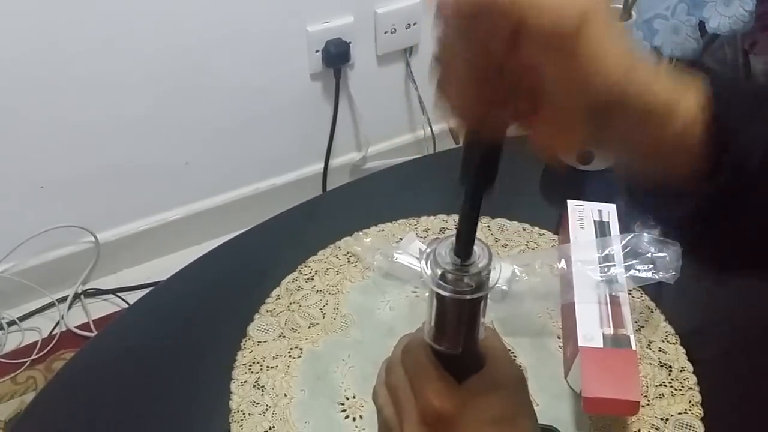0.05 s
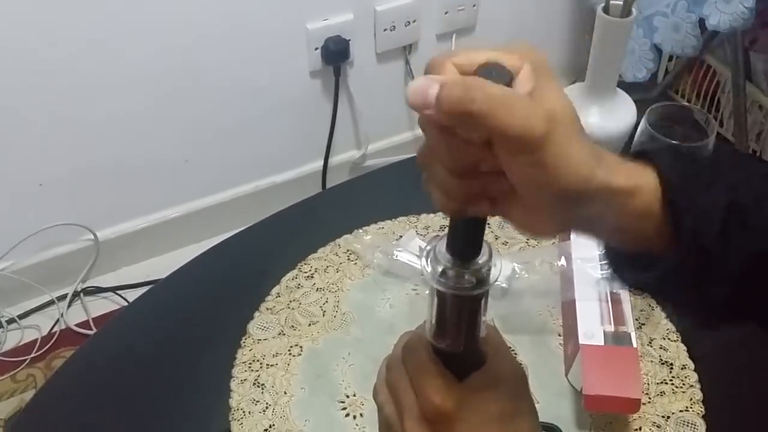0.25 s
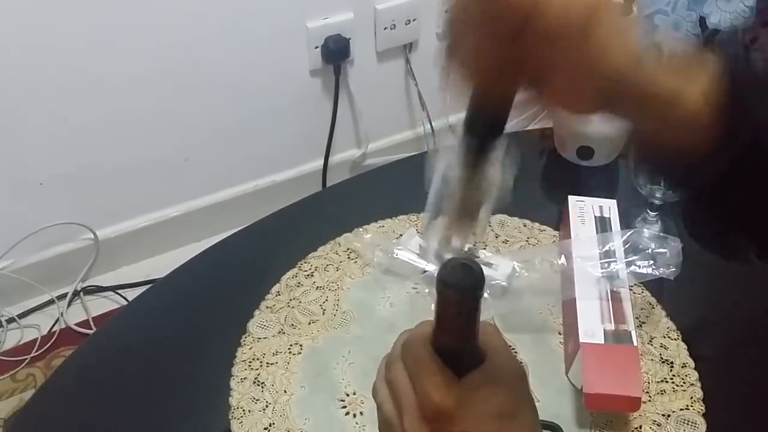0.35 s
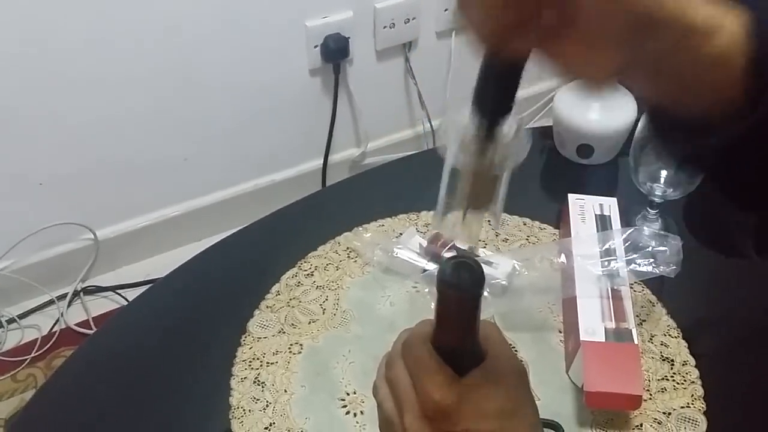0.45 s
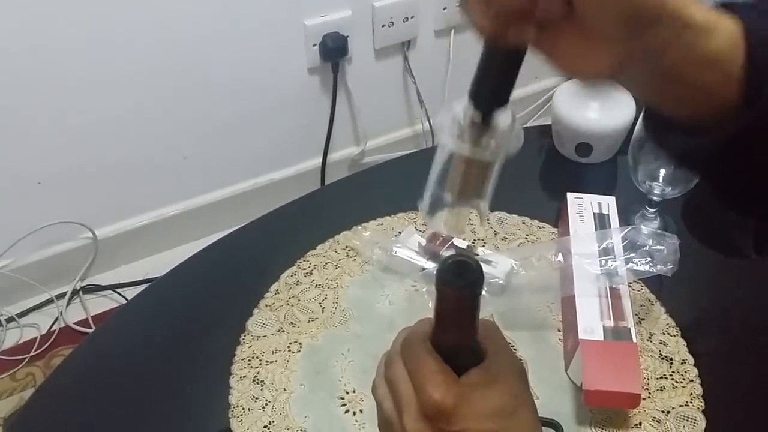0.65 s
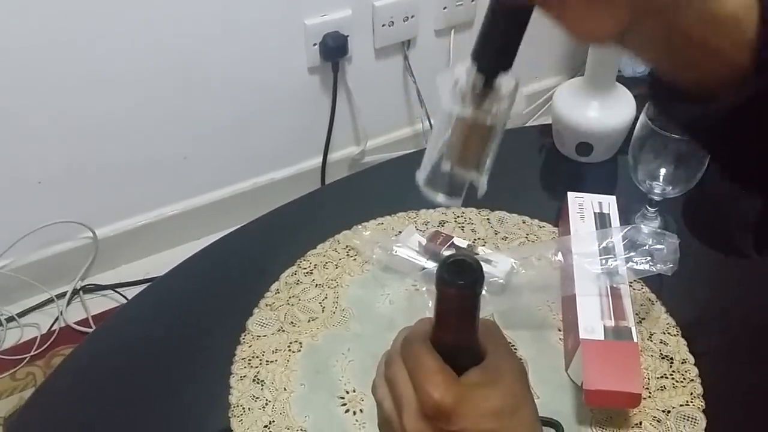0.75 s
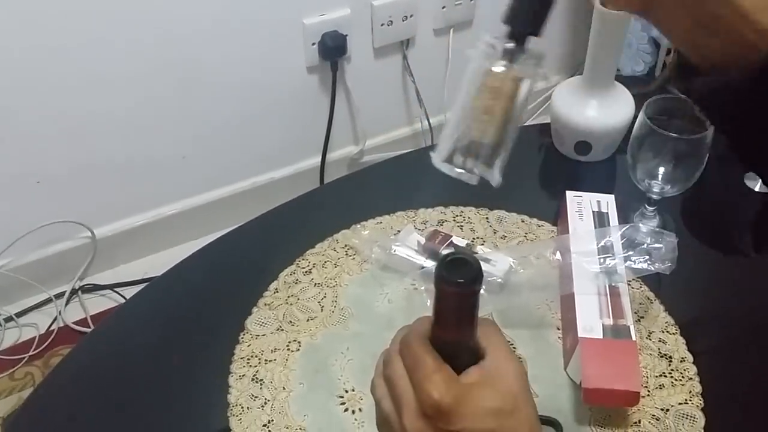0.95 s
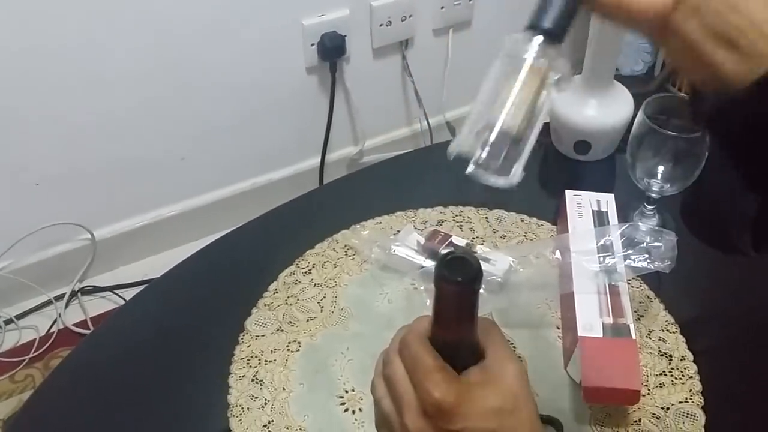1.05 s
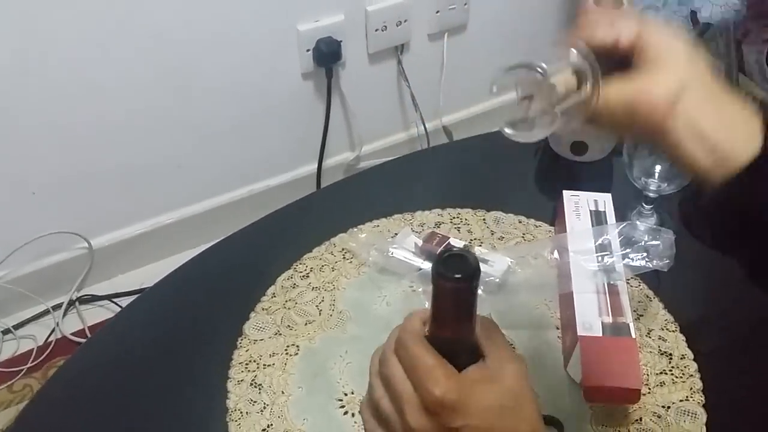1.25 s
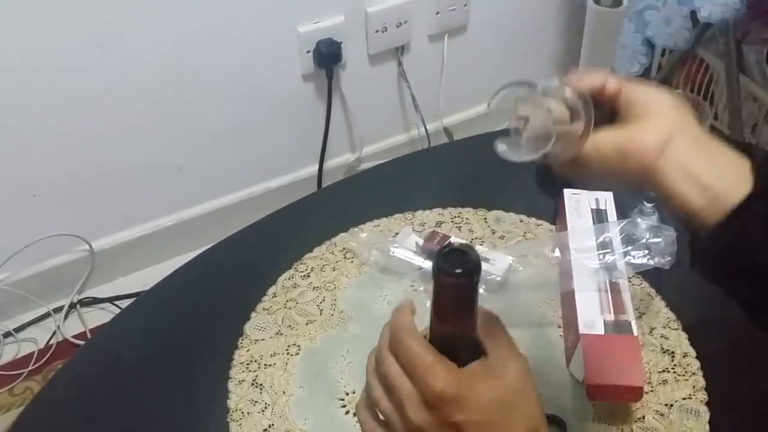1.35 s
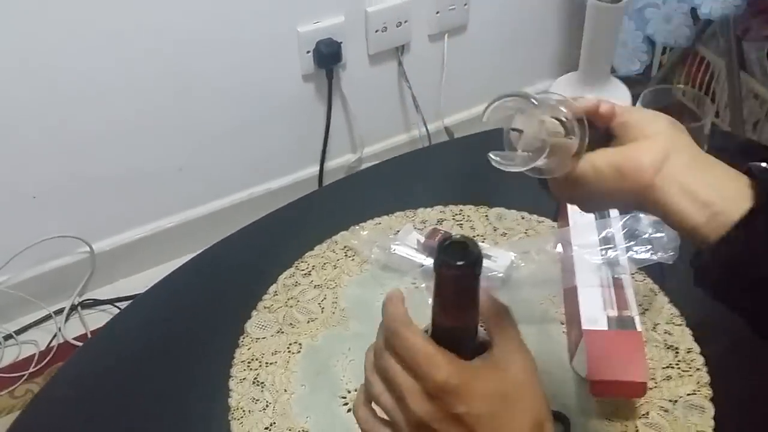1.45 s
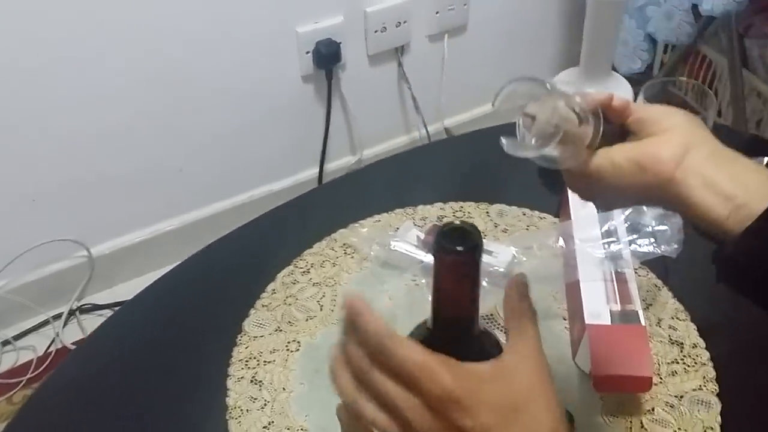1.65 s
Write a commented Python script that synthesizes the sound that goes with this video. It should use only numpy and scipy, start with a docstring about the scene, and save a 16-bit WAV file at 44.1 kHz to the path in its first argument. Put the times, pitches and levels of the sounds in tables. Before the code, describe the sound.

A cork pops from a wine bottle, close by in a small room. First an air-pump opener's plunger slides with a soft hiss, ticks and tiny squeaks, knocking on its stop at 0.2 seconds. At 0.3 the loud, hollow pop comes, the cork instantly slapping into the plastic tube, with brief reverberation. Two very faint taps follow near 0.55 and 0.7, then only faint electrical hum and hiss until 1.7.

```python
"""A cork pops from a wine bottle, pushed out by an air-pump opener on a table in a small room.
First the plunger slides down with a friction hiss, ticks and squeaks, and knocks on its stop.
The cork cracks free, and the escaping air rings the bottle neck and the low modes of bottle, tube and room.
The cork slaps into the opener's tube, the room reverberates briefly, and two faint taps follow.
Mains hum and faint hiss lie underneath."""
import sys
import numpy as np
from scipy import signal
from scipy.fft import rfft, irfft
from scipy.io import wavfile
from scipy.ndimage import uniform_filter1d

SR = 44100
rng = np.random.default_rng(int(sys.argv[2]) if len(sys.argv) > 2 else 0)


def to_wav(s):
    """Save 16-bit WAV."""
    ch = np.atleast_2d(s).T  # columns
    pcm = np.round(np.clip(ch, -1, 1) * 32767)  # PCM
    wavfile.write(sys.argv[1], SR, pcm.astype(np.int16))


N = 74970

# likeness of left and right noise: frequency_hz, correlation
COHERENCE = [(100, 0.87), (300, 0.82), (600, 1), (1100, .35), (2200, 0.045), (15000, 0.061)]
# partials of the mains hum: pitch_hz, level_db
HUM_PARTIALS = [(100, -70), (199.5, -62.5), (247.5, -72.5), (300, -83)]
# envelopes of hum, background hiss and plunger friction: time_s, gain_db
HUM_ENVELOPE = [(0, 8), (.15, 8.5), (.5, 0), (.65, -1.5), (.95, -2), (1.15, 1), (1.35, 6), (1.43, 0.5),
                (1.7, 1)]
HISS_ENVELOPE = [(0, -55), (.55, -65), (.9, -66.5), (1.1, -63.5), (1.35, -60), (1.5, -61.5), (1.7, -61)]
FRICTION_ENVELOPE = [(0, -71), (.035, -60), (.09, -57.5), (.135, -59.5), (.165, -51.5), (.185, -56),
                     (.26, -56.5), (.285, -51.5), (.31, -54), (.34, -75)]
# catches of the sliding plunger: start_s, level_db, pitch_hz
TICKS = [(0.0284, -43.5, 3000), (.0348, -49, 2860), (0.0494, -49.5, 2660), (0.0593, -47, 2640),
         (0.0936, -36.5, 2400), (0.309, -45.5, 2356)]
# squeaks of the seal: centre_s, width_s, pitch_hz, level_db
SQUEAKS = [(0.098, .012, 760, -59.5), (.168, .004, 5300, -54), (.25, 0.0042, 770, -37),
           (0.282, 0.0047, 765, -38.5)]
# taps as the opener is lifted away: start_s, level_db
TAPS = [(0.545, -59.5), (0.691, -60)]
# normal modes: pitch_hz, level_db, t60_s, rise_s
KNOCK_MODES = [(75.23, -36, .12, 0.0048), (234, -25, .09, 0.0025), (339.7, -11.5, .14, .032),
               (450, -30, 0.12, 0.0014), (752.5, -30.5, .17, 0.0024), (905, -30, .14, .002),
               (936, -39.5, 0.14, .002), (2820, -19.5, 0.017, 0.0001), (4920, -21.5, 0.0062, 0.00013),
               (3062, -42.5, .15, .001), (5010, -43, .2, .001)]  # pump and bottle
POP_MODES = [(168, -23.5, 0.13, 0.0034), (228.1, -19.5, 0.16, 0.002), (255.6, -17.5, 0.17, .002),
             (340.9, -26, .24, 0.0033), (428, -20, .19, 0.0024), (519.5, -25, .16, .003),
             (603.3, -15.5, .16, 0.0046), (628.3, -16.5, .17, 0.0084), (681, -21.5, 0.15, .005),
             (727, -22, .2, .005), (820, -19, 0.2, .004), (902.8, -21.5, .18, 0.0058),
             (968.4, -23, .22, .008), (997, -21.5, 0.32, .008), (1040, -19.5, 0.27, .01),
             (1145, -27.5, .18, .003), (1317, -31.5, 0.25, 0.0017), (1541, -36, .2, 0.0026)]  # bottle, tube and room
TUBE_MODES = [(3330, -26, .05, .001), (5010, -24.5, 0.061, 0.00087)]  # the opener's plastic tube
# noise spectra: frequency_hz, gain_db
HISS_SPECTRUM = [(25, 0), (60, -1.5), (100, 2.5), (170, 5.5), (300, -0.5), (500, -2), (800, -5),
                 (1600, -10), (3800, -19.5), (5200, -15), (6700, -6), (7500, -11.5), (8500, -22),
                 (14500, -23)]  # background hiss
FRICTION_SPECTRUM = [(200, -4.5), (340, 6), (480, -5), (770, 2), (1300, -5.5), (2900, -1), (4000, -3),
                     (5200, 0.5), (7200, -4.5), (9000, -10), (15000, -21)]  # rod on barrel
CLICK_SPECTRUM = [(500, -13.5), (1200, -8.5), (1900, 2), (2800, 2), (3900, -8.5), (5000, -1.5),
                  (7000, -2.5), (9000, -16.5), (11000, -29.5), (15000, -32.5)]  # plastic on plastic
KNOCK_ROOM_SPECTRUM = [(50, -14), (200, 2.5), (500, -6), (900, 1), (1300, -7.5), (2000, -11), (3000, -11.5),
                       (4000, -23), (5500, -18), (7200, -16), (9500, -23), (11000, -29), (15000, -35)]  # reverberation of the knock
BOOM_SPECTRUM = [(30, -31), (70, -17), (115, -18.5), (170, -6.5), (450, -3.5), (700, -1.5), (1080, 1.5),
                 (1300, -14.5), (1550, -23.5), (3000, -52.5)]  # low reverberation of the pop
TAIL_SPECTRUM = [(700, -14), (1400, 0), (2600, 1), (3800, -4), (5000, -0.5), (5700, -6), (6600, 4.5),
                 (8000, -4.5), (10000, -5), (14000, -11), (16000, -15)]  # bright reverberation of the pop
CRACK_SPECTRUM = [(800, -6), (1800, 1), (2700, 0), (3900, -5), (5200, -5), (6500, 9), (7800, -5.5),
                  (9200, 4), (11000, -10.5), (15000, -8.5)]  # cork leaving the neck
SLAP_SPECTRUM = [(800, -11.5), (1800, -3), (3100, 3), (4000, -6.5), (5000, -3), (7000, 1.5), (9000, -2.5),
                 (11000, -1), (14000, -6)]  # cork on tube
TAP_SPECTRUM = [(200, 1), (700, 5), (2000, 0), (3500, -18), (8000, -27)]  # handling

KNOCK_S, POP_S, CRACK_S, CATCH_S = .1978, .3164, .3171, .3372
PUMP_PAN_DB, POP_PAN_DB = 6.5, -1.45


def undb(db):
    """Amplitude ratio of a level in decibels."""
    return 10 ** (np.asarray(db) / 20)


def since(start):
    """Seconds elapsed since start, zero before it."""
    return np.maximum(np.arange(N) / SR - start, 0)


def envelope(points):
    """Gain over time, linear in decibels between (time_s, gain_db) points."""
    return undb(np.interp(since(0), *np.array(points).T))


def fade(t, t60, rise, hold=0):
    """Exponential build-up and damping: after the hold, 60 dB of decay every t60 seconds."""
    return (1 - np.exp(-t / rise)) * undb(-60 * np.maximum(t - hold, 0) / t60)


def pulse(t, centre, width):
    """Gaussian pulse whose width is its standard deviation."""
    return np.exp(-((t - centre) / width) ** 2 / 2)


def pan(db):
    """Stereo gains for a level difference, left over right."""
    gains = undb(np.array([[db], [-db]]) / 2)
    return gains / gains.mean()


def noise(spectrum):
    """Partially coherent stereo noise, alike in the bass and unrelated in the treble; mid rms is 1."""
    log_hz = np.log(np.maximum(np.fft.rfftfreq(N, 1 / SR), 1))
    along = lambda points: np.interp(log_hz, np.log(np.array(points)[:, 0]), np.array(points)[:, 1])
    correlation = along(COHERENCE)
    mid, side = rfft(rng.standard_normal((2, N))) * undb(along(spectrum))
    side = side * np.sqrt((1 - correlation) / (1 + correlation))
    return irfft(np.array([mid + side, mid - side]), N) / irfft(mid, N).std()


def ring(t, hz, db, t60, rise):
    """Damped oscillation of one normal mode."""
    return undb(db) * fade(t, t60, rise) * np.sin(2 * np.pi * hz * t)


def room_tone():
    """Slow random amplitude modulation makes each partial of the mains hum waver over faint hiss."""
    t, hum = since(0), 0
    for hz, db in HUM_PARTIALS:
        waver_db = 2 * np.interp(t, np.linspace(0, t[-1], 40), rng.standard_normal(40))
        hum += undb(db + waver_db) * np.sqrt(2) * np.sin(2 * np.pi * (hz * t + rng.random()))
    return hum * envelope(HUM_ENVELOPE) + noise(HISS_SPECTRUM) * envelope(HISS_ENVELOPE)


def plunger():
    """Sliding friction of rod on barrel makes noise; each catch excites a damped plastic tick."""
    out = noise(FRICTION_SPECTRUM) * envelope(FRICTION_ENVELOPE) * pan(PUMP_PAN_DB)
    click_noise, room_noise = noise(CLICK_SPECTRUM), noise(CLICK_SPECTRUM)
    t60 = .016
    for start, db, hz in TICKS:
        t = since(start)
        tone = ring(t, hz, db, t60, rise=.00016) + ring(t, 2 * hz, db - 2.5, t60, rise=.000204)
        click = click_noise * undb(db - 6) * fade(t, t60, rise=.0001)
        room = room_noise * undb(db - 16.5) * fade(t, t60=.1125, rise=.004)
        out += (tone + click) * pan(PUMP_PAN_DB) + room
    return out


def seal_squeaks():
    """Stick-slip oscillation of the seal gives brief tones of unsteady pitch."""
    jitter, out = .019, 0
    for centre, width, hz, db in SQUEAKS:
        wobble = uniform_filter1d(rng.standard_normal(N), size=100)
        phase = 2 * np.pi * np.cumsum(hz * (1 + jitter * wobble / wobble.std())) / SR
        out += undb(db) * pulse(since(0), centre, width) * np.sin(phase)
    return out


def plunger_knock():
    """Impact on the stop makes a click and excites the modes of pump and bottle; the room reverberates."""
    t = since(KNOCK_S)
    # lower modes lie nearer the centre
    body = sum(ring(t, hz, *rest) * pan(PUMP_PAN_DB * min(hz / 3000, 1)) for hz, *rest in KNOCK_MODES)
    click = noise(CLICK_SPECTRUM) * undb(-20) * fade(t, t60=.0098, rise=.0001) * pan(PUMP_PAN_DB)
    room = noise(KNOCK_ROOM_SPECTRUM) * undb(-29.5) * fade(t, t60=.27, rise=.0025)
    return body + click + room


def neck_resonance(t):
    """The air in the neck oscillates, its resonant frequency rising as the cork clears the mouth."""
    start_hz, open_hz, clear_s = 498, 1079, .0024
    opening = (1 + np.tanh((t - clear_s) / .00036)) / 2
    hz = start_hz + (open_hz - start_hz) * opening
    phase = 2 * np.pi * np.cumsum(hz * (t > 0)) / SR
    puff = undb(-3) * pulse(t, centre=.002, width=.0011)
    note = undb(-8) * fade(t, t60=.13, rise=.006)
    room = undb(-27) * fade(t, t60=.17, rise=.03)
    return (puff + note + room) * np.sin(phase)


def low_resonances():
    """Free vibration of bottle, tube and room; a time difference sets the modes on alternate sides."""
    lag_s = np.array([[.00025], [-.00025]]) / 2
    return sum(ring(since(POP_S + (-1) ** k * lag_s), *mode) for k, mode in enumerate(POP_MODES))


def cork_pop():
    """Pressure release excites the neck and the low modes; the small mouth radiates bass poorly."""
    right_lag_s = .00014
    neck = np.array([neck_resonance(since(POP_S + lag)) for lag in (0, right_lag_s)])
    radiation = signal.butter(2, 135.1, "high", fs=SR, output="sos")
    return signal.sosfilt(radiation, neck + low_resonances()) * pan(POP_PAN_DB)


def pop_reverberation():
    """Reverberation of the small room decays exponentially, as a low boom and a bright tail."""
    t = since(POP_S)
    boom = noise(BOOM_SPECTRUM) * undb(-17.5) * fade(t, t60=.28, rise=.017)
    tail = noise(TAIL_SPECTRUM) * undb(-29.5) * fade(t, t60=.225, rise=.005, hold=.027)
    return boom * pan(POP_PAN_DB) + tail * pan(db=2)


def cork_crack():
    """The cork's last slip and sudden release make a short, hence broadband, transient."""
    slip = undb(-22) * pulse(since(0), CRACK_S, width=.00036)
    release = undb(-8) * fade(since(CRACK_S), t60=.008, rise=.0001)
    return noise(CRACK_SPECTRUM) * (slip + release) * pan(db=9)


def cork_catch():
    """Impact of the flying cork makes a slap and excites the modes of the plastic tube."""
    t = since(CATCH_S)
    slap = noise(SLAP_SPECTRUM) * undb(-11) * fade(t, t60=.018, rise=.0026)
    ping = sum(ring(t, *mode) for mode in TUBE_MODES)
    return (slap + ping) * pan(db=7)


def handling_taps():
    """Light impacts, as the opener is lifted away, give quickly damped bursts of noise."""
    bursts = sum(undb(db) * fade(since(start), t60=.048, rise=.001) for start, db in TAPS)
    return noise(TAP_SPECTRUM) * bursts


def scene():
    """Superposition of room tone, pump stroke, cork and handling."""
    stroke = plunger() + seal_squeaks() + plunger_knock()
    cork = cork_pop() + pop_reverberation() + cork_crack() + cork_catch()
    return stroke + cork + handling_taps() + room_tone()


def record(dry):
    """Hard clipping limits the highest peak; a steep low-pass filter removes the top of the treble."""
    low_pass = signal.ellip(12, .2, 100, 14400, fs=SR, output="sos")
    return signal.sosfilt(low_pass, np.clip(dry, -.95, .95))


dry = scene()
out = record(dry)
to_wav(out)
```